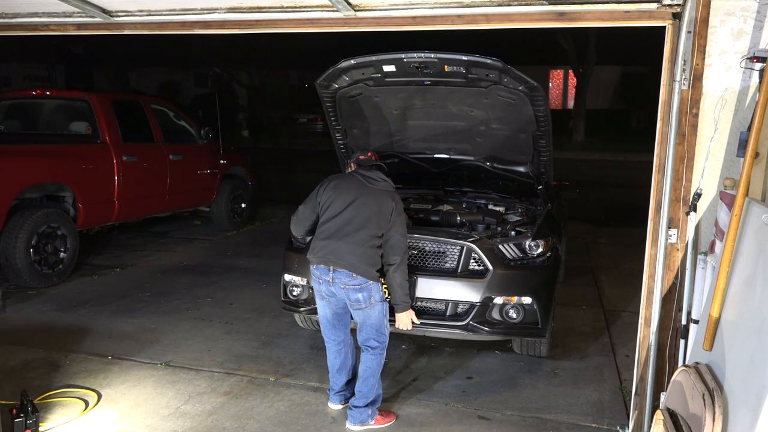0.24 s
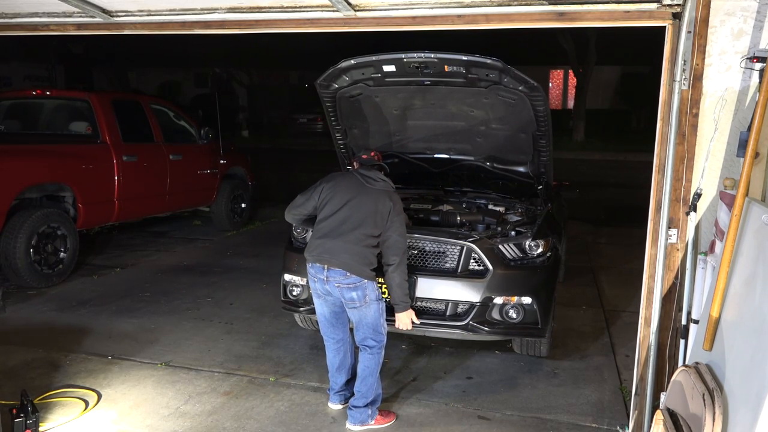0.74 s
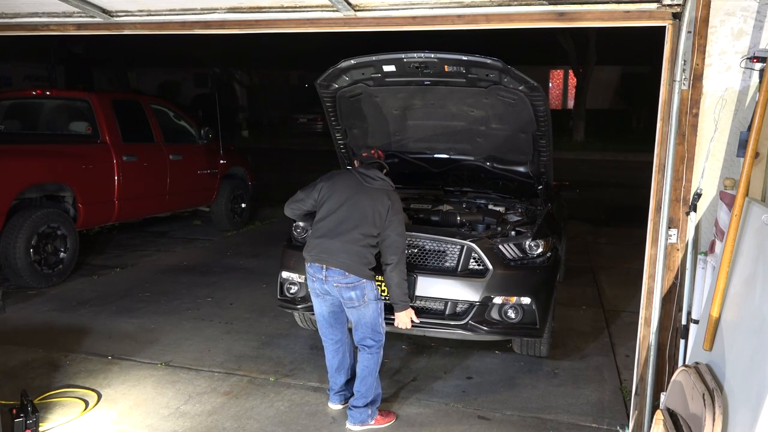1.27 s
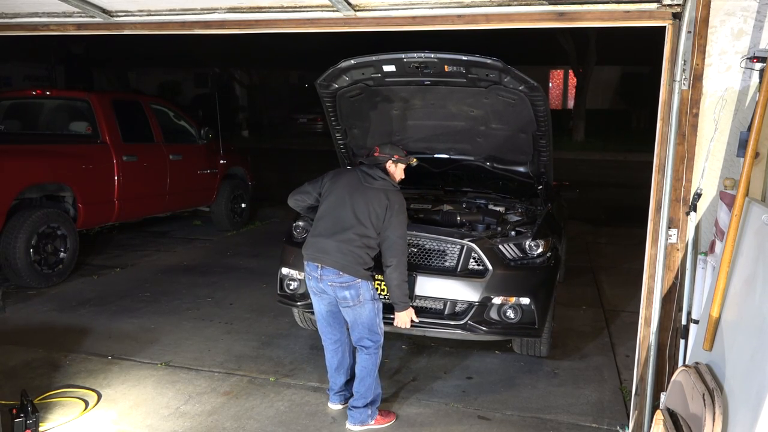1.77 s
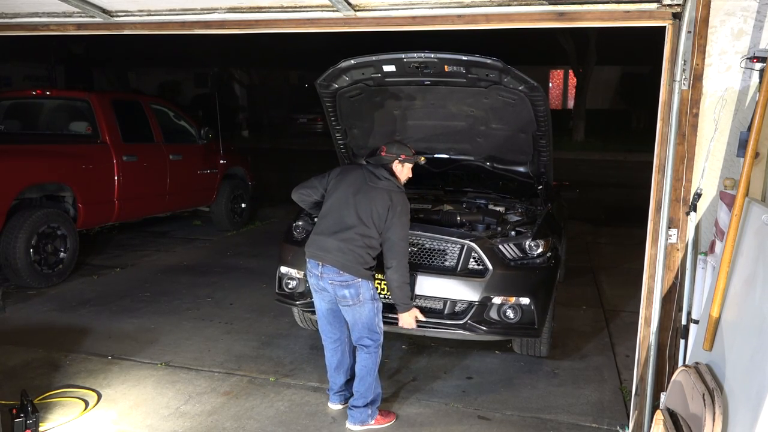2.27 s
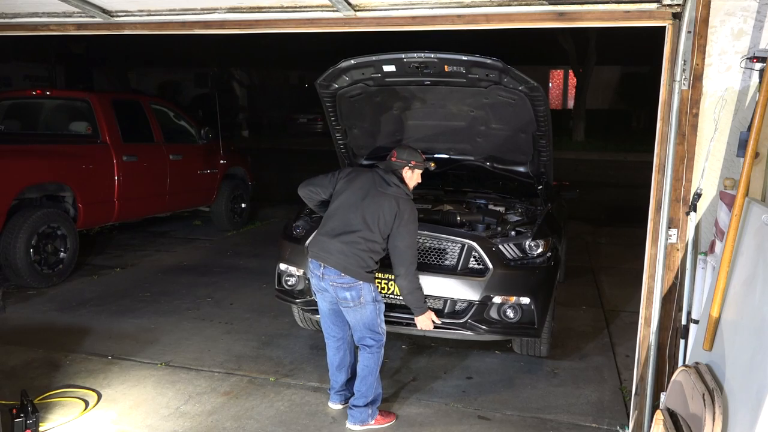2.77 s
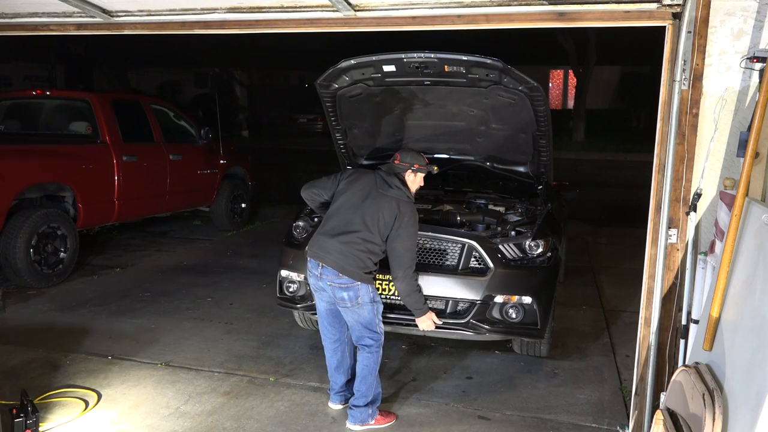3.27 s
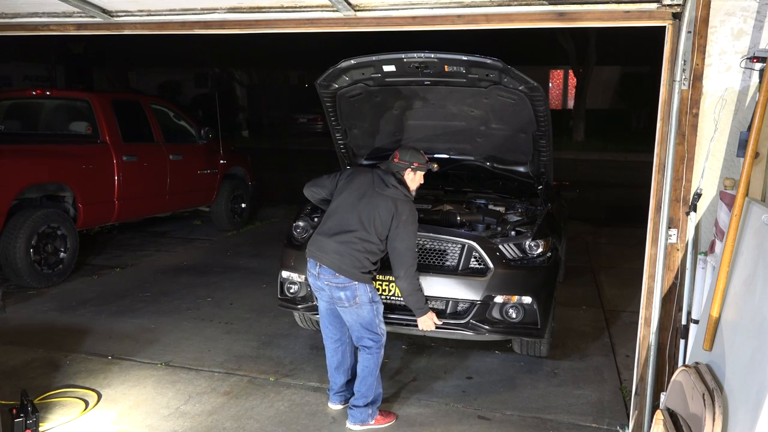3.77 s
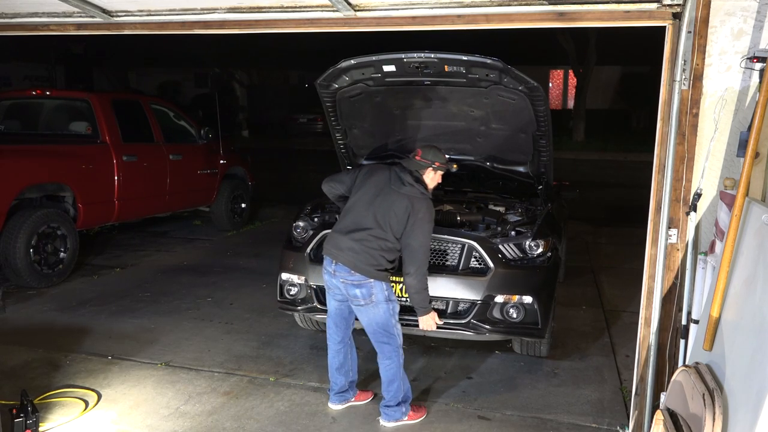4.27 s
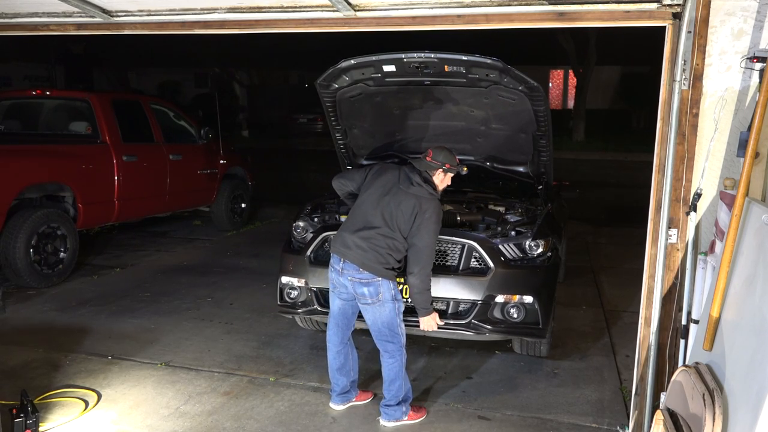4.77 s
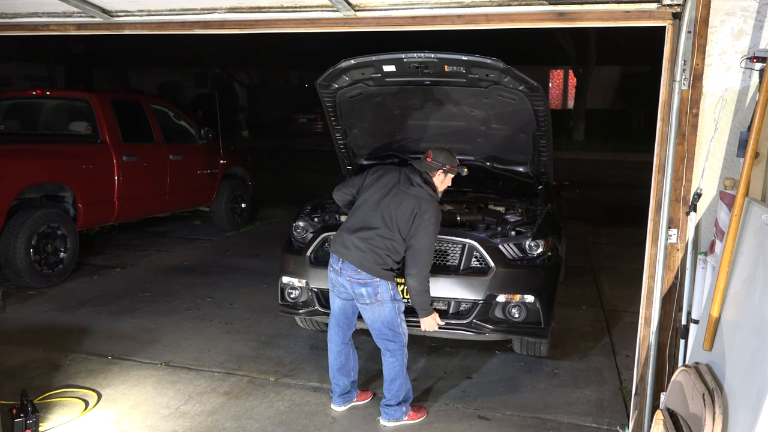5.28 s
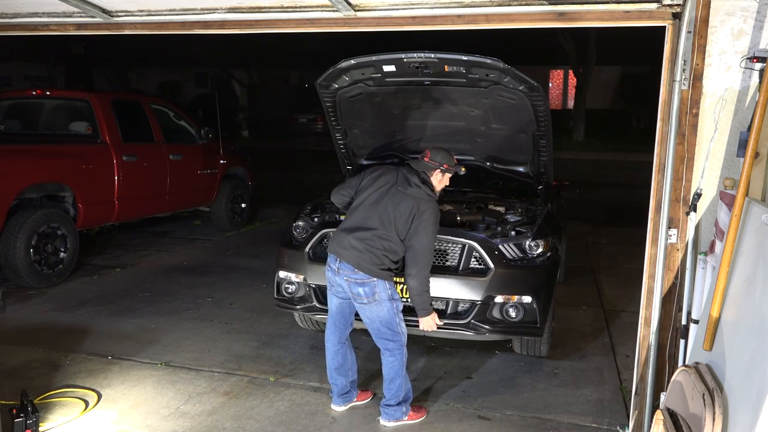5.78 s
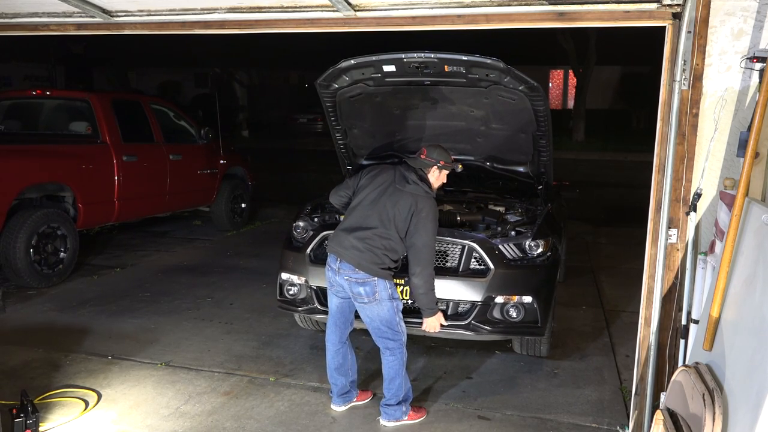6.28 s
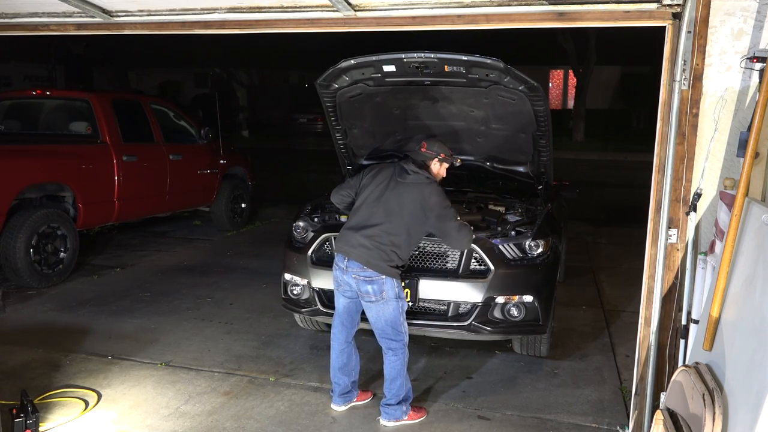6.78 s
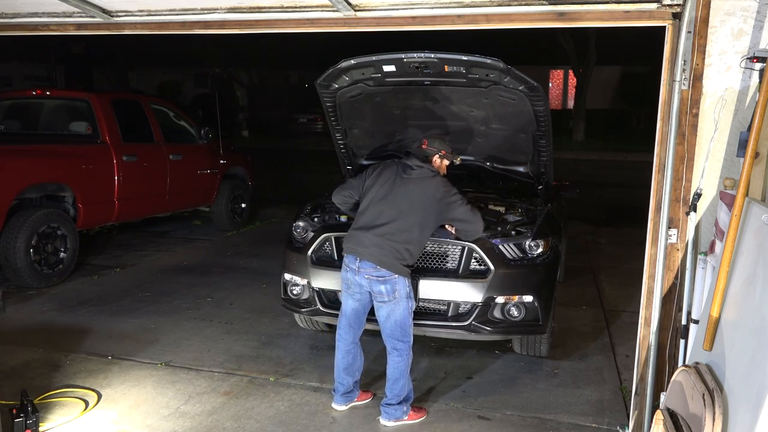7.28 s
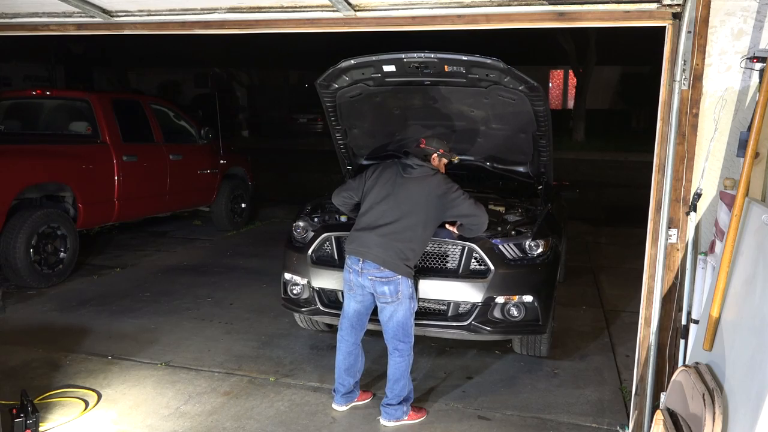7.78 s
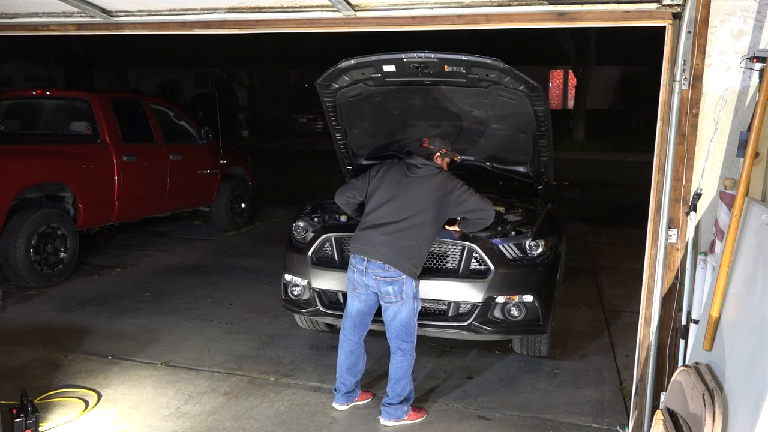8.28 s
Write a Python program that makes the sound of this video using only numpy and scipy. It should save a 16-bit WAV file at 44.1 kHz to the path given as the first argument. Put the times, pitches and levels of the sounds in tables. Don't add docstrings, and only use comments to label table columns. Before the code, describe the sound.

Hollow plastic bumper cover tugged off its clips, irregular knocks, snaps and clacks with short squeaks, in a garage with faint traffic hum.

```python
import sys
import numpy as np
from scipy import signal
from scipy.fft import rfft, irfft, next_fast_len
from scipy.io import wavfile
from scipy.ndimage import uniform_filter1d, map_coordinates

SR = 44100
rng = np.random.default_rng(int(sys.argv[2]) if len(sys.argv) > 2 else 0)


def inscribe(sig):
    pcm = np.round(np.clip(np.atleast_2d(sig).T, -1, 1) * 32767)
    wavfile.write(sys.argv[1], SR, pcm.astype(np.int16))


def gain_from_decibels(decibels):
    exponent = np.asarray(decibels, float) / 20
    return 10 ** exponent


N = 376613
SPAN = 2 ** 14

# frequency [Hz], level [dB per Hz].
RUMBLE_SPECTRUM = [(18, -59), (30, -0.5), (107, -1.5), (151, -9.5), (189, -7.5), (216, -11), (309, -39),
                   (350, -14.5), (460, -62), (770, -120)]
# frequency [Hz], level [dB per Hz].
STREET_SPECTRUM = [(120, -47), (200, -1.5), (220, -16), (255, -1), (302, -7), (343, -6), (613, -9.5),
                   (916, -9.5), (2500, -24), (3250, -64), (5500, -120)]
# frequency [Hz], level [dB per Hz].
TYRE_SPECTRUM = [(1200, -17), (2000, -39), (2600, 2.5), (3300, 2), (3900, -2), (5500, -9.5), (9000, -16.5)]
# time [s], level over rest [dB].
STRAIN = [(0, 0.5), (.76, 0.5), (1.12, 6.5), (1.38, 1), (2.28, 1.5), (2.76, 3), (2.97, 5), (3.16, 1.5),
          (3.88, 1.5), (4.33, 5.5), (4.5, 2.5), (4.73, 5), (5.02, 2), (5.25, -3), (5.4, 4), (6.14, 1.5),
          (7.63, 2), (8.16, 2.5)]
# frequency [Hz], level [dB per Hz].
AMPLIFIER_SPECTRUM = [(1500, -11.5), (4000, -4.5), (8000, -1.5), (13000, -2.5), (16000, -2.5)]
# frequency [Hz], time to fall by 60 dB [s].
GARAGE_DECAY = [(100, 0.38), (700, 0.26), (2000, 0.28), (5000, 0.3), (13000, 0.26)]

# start [s], rise [s], hold [s], hiss level [dB], body re hiss [dB].
SLIDES = [
    (2.245, .13, 0.19, -43.2, 2.5),
    (3.957, .05, .02, -49, 7),
    (4.119, 0.022, .004, -47, -6),
    (4.774, 0.072, 0.14, -49, 6.5),
    (6.282, .07, 0.11, -50.5, 5),
    (7.21, 0.061, 0.079, -59.5, 6.5),
]
# frequency [Hz], level [dB per Hz].
SLIDE_HISS = [(2350, -30), (4000, -0.5), (5130, -3.5), (6590, -6), (12800, -9.5), (14800, -14),
              (16000, -13)]
# frequency [Hz], level [dB per Hz].
SLIDE_BODY = [(600, -27), (1350, 6), (1850, -3), (2050, 8), (2350, -3), (3500, 0), (5200, -14.5),
              (7000, -60)]

# start [s], peak level [dB], pitch [Hz], length [s].
SQUEAKS = [(.01, -34, 415, 0.013), (4.9995, -21.5, 3230, 0.0055), (6.3, -37.5, 1500, 0.034),
           (6.791, -21, 1170, 0.006), (4.858, -29, 2900, 0.0086), (7.129, -49, 3030, 0.011),
           (7.265, -45, 2800, 0.005), (7.345, -47, 2900, .01), (7.283, -41, 2900, 0.005),
           (7.303, -40, 3200, .004), (7.317, -42, 3150, .005), (7.81, -33.5, 1270, 0.014),
           (8.048, -21, 3170, 0.0024), (4.299, -20, 980, 0.014), (8.058, -24, 1300, 0.006),
           (8.05, -42, 5300, .012), (8.052, -42, 8100, .011), (8.052, -43, 10100, .008),
           (7.236, -40, 700, .012), (7.242, -43, 1300, .006), (7.305, -51, 5400, .006),
           (7.236, -45, 2900, .003), (4.862, -20, 480, .006), (4.87, -30, 2600, .012)]
# start [s], peak level [dB], pitch [Hz], rattle length [s].
CHATTERS = [(4.139, -39, 6000, .004), (4.139, -43, 7700, .004), (4.116, -48, 3200, .006),
            (4.1845, -41, 3700, .004), (4.187, -39, 1300, .004), (4.211, -42, 2100, .005),
            (4.238, -36, 2900, .003), (4.24, -32, 1500, .005), (4.2905, -23, 2800, .003),
            (4.292, -19, 980, .005), (4.997, -47, 9100, .0015), (5.066, -50, 9100, .0015),
            (5.066, -50, 7700, .0015), (5.136, -29, 2900, .002), (4.645, -50, 4800, .006),
            (4.662, -52, 6400, .01), (5.376, -49, 5200, .002), (5.374, -36, 2000, .003),
            (8.0475, -28, 3200, .002), (8.048, -24, 1800, .004), (8.049, -33, 4900, .003),
            (8.053, -27, 1270, .006), (8.049, -43, 8200, .003), (6.791, -28, 1170, .004),
            (6.792, -41, 2800, .004), (5.69, -28, 1380, .006), (5.812, -27, 1050, .006),
            (5.792, -31, 1800, .004), (3.068, -33, 2000, .002), (4.728, -27, 430, .008),
            (4.296, -22, 280, .008)]

# frequency [Hz], width [Hz], level [dB].
CLIP_MODES = [(1500, 660, 0.5), (2290, 570, 0.5), (2920, 1120, -3.5)]
# frequency [Hz], level [dB].
TICK_SPECTRUM = [(2500, -24), (4500, 9.5), (7000, 0), (10000, -15), (16000, -22)]
# frequency [Hz], level [dB].
FIZZ_SPECTRUM = [(5000, -9), (9000, -1.5), (13000, -4), (16000, -12)]
# start [s], peak level [dB], tick re peak [dB], fizz re peak [dB].
CLIP_SNAPS = [(.897, -42, -26.5, -25), (.922, -35, -16, -32.5), (1.206, -35.5, -11, -34),
              (1.244, -42, -16, -20.5), (1.528, -45, -27, -16), (2.023, -44, -23, -25.5),
              (2.6823, -41, -24, -27), (2.77, -34, -25, -28), (2.787, -30, -23, -29), (2.87, -42, -24, -24),
              (2.945, -30, -16, -28), (2.978, -32, -22, -30), (3.067, -25.5, -57, -39),
              (3.322, -31, -35, -35), (4.004, -43, -23.5, -18), (4.1404, -44, 2, -12),
              (4.4514, -26, -20, -31), (5.1367, -17, -17.5, -24.5), (5.207, -35, -24, -25),
              (5.357, -59, -21, -23), (5.4046, -19, -37, -27), (5.768, -25.5, -38, -51),
              (6.115, -47.5, -14, -12), (7.243, -37.5, -22, -21), (7.953, -39, -25, -25),
              (8.4964, -28.5, -12.5, -27)]
# start [s], peak level [dB], tick re peak [dB], fizz re peak [dB].
CLIP_SLIPS = [(1.6003, -42, -41, -22), (1.674, -41.5, -25, -30), (3.4484, -34.5, -16.5, -24),
              (3.861, -40, -33, -28), (3.915, -41, -16, -16), (3.9765, -28.5, -40, -31),
              (4.235, -32, -26, -30), (4.725, -38.5, -15, -30), (5.6695, -30, -19, -30),
              (5.691, -22, -16.5, -28), (5.7917, -20, -25, -32.5), (6.7725, -37, -25, -22),
              (6.791, -24.5, -27, -31), (7.81, -41.5, -18, -27), (.958, -28.5, -17, -29)]
# start [s], peak level [dB], tick re peak [dB], fizz re peak [dB].
TAB_SNAPS = [
    (.789, -47.5, -8, -34),
    (1.119, -42, -25, -25),
    (1.3877, -42, -14, -30),
    (2.648, -41, -34, -31),
    (4.2895, -15.5, -13.5, -27),
    (4.856, -22, -55.5, -22.5),
    (5.0667, -25, -31, -28),
    (5.376, -31.5, -22, -24),
    (6.927, -38, -14, -32.5),
]
# start [s], peak level [dB], tick re peak [dB], fizz re peak [dB].
PIN_SNAPS = [
    (.9887, -15, -6.5, -34),
    (1.037, -49, -24, -43),
    (4.1849, -36, -16, -15),
    (4.6427, -28.5, -15.5, -56),
    (5.0, -21, -21, -23),
    (7.2935, -39, -14, -31),
    (8.0485, -23, -12, -10),
    (8.2154, -36.5, -37, -21),
    (8.4153, -33.5, -19, -28),
]

# peak time [s], peak level [dB], pitch [Hz], length [cycles].
BLOWS = [(0.9858, -3, 440, 0.77), (0.9885, -7, 700, 1.8), (2.983, -14, 404, 0.54), (4.294, -14, 950, 1.8),
         (5.4119, -10, 400, 0.64), (5.7048, -3, 440, 1.9), (5.3845, -15, 590, 1.1),
         (6.3695, -22, 610, 0.92), (6.803, -15, 650, 0.81), (5.203, -17, 530, 1.2), (5.139, -13, 1050, 1.2),
         (5.0725, -14, 900, 1.1), (5.155, -13, 1000, 1.1), (1.9945, -29, 730, 6), (5.4265, -17, 140, 2.5),
         (5.4275, -14, 420, 5), (5.445, -19, 135, 2.5), (5.43, -22, 60, 2.5), (6.81, -28, 62, 2.5),
         (1.01, -27, 60, 2.5), (4.2855, -24, 2400, 1.2), (2.9, -19, 420, 4), (2.905, -24, 170, 2.5),
         (2.91, -30, 680, 4), (2.789, -19, 150, 1.5), (2.773, -27, 1000, 5), (2.846, -25, 200, 1.5),
         (5.409, -17, 1180, 5), (4.119, -31, 280, 1.5), (5.812, -20, 230, 2), (5.7105, -14.5, 450, 3),
         (6.822, -22, 480, 3), (5.41, -15, 420, 4), (5.378, -20, 420, 5)]
# frequency [Hz], width [Hz], level [dB].
SHELL_MODES = [(280.6, 69, -2), (422, 103, -0.5), (577, 174, -4.5)]
# frequency [Hz], width [Hz], level [dB].
SMALL_PANEL_MODES = [(700, 149, 2), (980, 102, 3), (1210, 240, 0.5)]
# frequency [Hz], width [Hz], level [dB].
HOLLOW_MODES = [(65, 20, -8), (146, 55, -1), (208, 170, -13.5)]
# start [s], peak level [dB], thud re peak [dB], small panels re peak [dB].
WIDE_KNOCKS = [(1.118, -20, -14, -21), (3.068, -20.5, -11, -4), (3.099, -21.5, -5, -12),
               (3.322, -26.5, -16, -4), (3.861, -28, -12.5, -11.5), (3.973, -21, -2, -4.5),
               (4.016, -23, -10, -28), (4.106, -29.5, -1, -27), (4.196, -25.5, -5, -7.5),
               (4.325, -44, -16, 13), (5.062, -15.5, -21, -5), (5.239, -32.5, 1, -.5),
               (5.819, -17, -10.5, -8), (6.361, -22, -7.5, -10), (6.771, -20.5, -9, -7),
               (6.795, -19, -7, -6), (7.62, -32, -7, -6.5), (7.955, -24, -19, -22),
               (8.048, -24.5, -8.5, -2), (6.082, -20, -7, -16.5), (8.415, -21, -10, -12)]
# start [s], peak level [dB], thud re peak [dB], small panels re peak [dB].
MIDDLE_KNOCKS = [(.985, -8, -10.5, -6), (1.249, -32, -10, -3), (1.993, -27, -6, -9),
                 (2.761, -22.5, -13, 0.5), (2.875, -14, -11.5, -9), (2.894, -19, -10, -4),
                 (2.976, -13, -10.5, -12), (3.149, -31, -2, -3.5), (4.45, -13, -8, -15),
                 (4.507, -22, -12, -25), (4.721, -22, -8, -10), (5.135, -16, -10, -3.5),
                 (5.2, -16, -5, -10), (5.35, -26, -8, -5), (5.371, -13, -12, -8.5),
                 (5.405, -10.5, -7.5, -6.5), (5.433, -15.5, -16, -15), (5.675, -13, -4.5, -10.5),
                 (5.695, -9.5, -18, -11.5), (5.769, -16, -4.5, -9), (6.927, -36, -15, 0.5),
                 (7.812, -38, -5, -19)]
# start [s], peak level [dB], thud re peak [dB], small panels re peak [dB].
CORNER_KNOCKS = [(1.029, -26, -5, 3), (1.388, -40.5, -2, 2), (1.523, -29, -22, -7), (3.447, -19.5, 2.5, -8),
                 (3.489, -40.5, -8, 8), (4.233, -22.5, -17, -5), (4.287, -9, -10.5, -4.5),
                 (4.643, -29.5, -22, -6.5), (4.858, -16.5, -28, -7), (4.998, -20, -9, -3.5),
                 (5.279, -29.5, -2.5, -10), (5.786, -17.5, -17, -4.5), (6.819, -26, -2, -9),
                 (7.237, -40.5, -15, 5), (8.495, -35, -30, 8.5)]
# start [s], peak level [dB], thud re peak [dB], small panels re peak [dB].
RUBS = [
    (.962, -19, -2.5, -13),
    (1.19, -21.5, -6, -15),
    (1.645, -26.5, -10, -9),
    (2.742, -18, -6.5, -23),
    (2.789, -24.5, -5, -18),
    (5.021, -23, -2, -22),
]


def along(points, hz):
    f, v = np.transpose(points)
    return np.interp(np.log(hz + 1), np.log(f + 1), v)


def unit(x):
    return x / np.sqrt(np.mean(x ** 2) + 1e-20)


def wobble(rate):
    knots = rng.standard_normal(int(N * rate / SR) + 4)
    return map_coordinates(knots, [np.arange(N) * rate / SR])


def noise(spectrum, patchy_db):
    z = signal.stft(rng.standard_normal(N), nperseg=512)[2]
    field = uniform_filter1d(rng.standard_normal(z.shape), 5, 0)
    field = uniform_filter1d(field, 10, 1)
    patchy = signal.istft(z * gain_from_decibels(patchy_db * unit(field)), nperseg=512)[1][:N]
    size = next_fast_len(N + 8192)
    colour = gain_from_decibels(along(spectrum, np.fft.rfftfreq(size, 1 / SR)))
    return unit(irfft(rfft(patchy, size) * colour, size)[:N])


def modes(hz, rows):
    return sum((-1) ** k * gain_from_decibels(db) * 1j * hz * width / (centre ** 2 - hz ** 2 + 1j * hz * width)
               for k, (centre, width, db) in enumerate(rows))


def own_modes(hz, centres, width, db):
    return np.array([modes(hz, [(centre, width * centre, db)]) for centre in centres])


def contacts(lengths, lead, spiky, wet_db):
    t = np.arange(SPAN) / SR
    draws = rng.standard_normal((len(lengths), 2, SPAN))
    length = np.clip(lengths, .001, .06)[:, None]
    grains = np.sign(draws[:, 0]) * abs(draws[:, 0]) ** spiky
    rattle = grains * (t / length) ** 0.6 * np.exp(-t / length)
    rattle = rattle / np.linalg.norm(rattle, axis=1, keepdims=True)
    strike = lead * 0.0044 / (0.0022 + length) * (t == 0)
    hz, s, z = signal.stft(draws[:, 1], SR, nperseg=256)
    decay = gain_from_decibels(-60 * s / along(GARAGE_DECAY, hz)[:, None])
    walls = signal.istft(z * decay, SR, nperseg=256)[1][:, :SPAN]
    walls = walls * (1 - np.exp(-(t / (0.002 + 1.06 * length)) ** 2))
    walls = walls / np.linalg.norm(walls, axis=1, keepdims=True)
    return rfft(rattle + strike + gain_from_decibels(wet_db) * walls)


def placed(times, levels_db, spectra, smooth):
    sounds = irfft(spectra)[:, :SPAN - 1024]
    power = uniform_filter1d(sounds[:, :SPAN // 8] ** 2, round(smooth * SR))
    peaks = np.sqrt(abs(power).max(1))
    out = np.zeros(N + 2 * SPAN)
    for s, gain, sound in zip(times, gain_from_decibels(levels_db) / peaks, sounds):
        out[round(s * SR):][:len(sound)] += gain * sound
    return out[:N]


def events(kinds):
    return np.transpose(sorted((*row, hz, length) for rows, hz, length in kinds for row in rows))


def night():
    s, db = np.transpose(STRAIN)
    strain_db = np.interp(np.arange(N) / SR, s, db)
    rumble_db = -39.5 + 0.12 * strain_db + 0.32 * wobble(18)
    street_db = -48.5 + strain_db + 1.0 * wobble(3.46)
    tyres_db = -65 + 1.1 * strain_db + 0.82 * wobble(2.83)
    rumble = gain_from_decibels(rumble_db) * noise(RUMBLE_SPECTRUM, patchy_db=0.5)
    street = gain_from_decibels(street_db) * noise(STREET_SPECTRUM, patchy_db=1.5)
    tyres = gain_from_decibels(tyres_db) * noise(TYRE_SPECTRUM, patchy_db=1.0)
    return rumble + street + tyres


def slides():
    hiss, body = np.zeros(N), np.zeros(N)
    release = 0.073
    for s, rise, hold, db, body_db in SLIDES:
        moments = np.cumsum([0, rise, hold, release])
        t = np.arange(round(moments[-1] * SR)) / SR
        press = gain_from_decibels(db + np.interp(t, moments, [-20.5, 0, -6, -29]))
        hiss[round(s * SR):][:len(t)] += press
        body[round(s * SR):][:len(t)] += press * gain_from_decibels(body_db)
    grip = gain_from_decibels(.6 * wobble(40) + 1.4 * wobble(300))
    return grip * (hiss * noise(SLIDE_HISS, patchy_db=.7) + body * noise(SLIDE_BODY, patchy_db=1.2))


def squeaks():
    out, t = np.zeros(N + SPAN), np.arange(SPAN) / SR
    for s, db, hz, length in SQUEAKS:
        drift = 0.065 * np.cumsum(rng.standard_normal(SPAN))
        catch_db = 1.8 * unit(uniform_filter1d(rng.standard_normal(SPAN), 150))
        swell = gain_from_decibels(db + 1.5 + catch_db) * t / length * np.exp(-t / length)
        out[round(s * SR):][:SPAN] += swell * np.sin(2 * np.pi * hz * t + drift)
    return out[:N]


def chatters():
    s, db, own_hz, length = np.transpose(CHATTERS)
    hz = np.fft.rfftfreq(SPAN, 1 / SR)
    own = own_modes(hz, own_hz, width=.3, db=0) ** 2
    return placed(s, db - 3, contacts(length, lead=.4, spiky=2.2, wet_db=-5) * own, smooth=.004)


def clips():
    s, db, tick_db, fizz_db, lead_hz, length = events([
        (CLIP_SNAPS, 1420, 0.0037), (CLIP_SLIPS, 1400, 0.0094),
        (TAB_SNAPS, 2470, 0.0072), (PIN_SNAPS, 3440, 0.0031)])
    hz = np.fft.rfftfreq(SPAN, 1 / SR)
    burst = contacts(length, lead=0.62, spiky=1.7, wet_db=0.5)
    own = own_modes(hz, lead_hz, width=0.19, db=1.5)
    stiff = 1j * hz / (900 + 1j * hz) / (1 - (hz / 4200) ** 2 + 1.2j * hz / 4200) ** 2
    rings = placed(s, db - 7.5, burst * stiff * (1 + own) * modes(hz, CLIP_MODES), smooth=0.0052)
    edge = contacts(1.04 * length, lead=0.53, spiky=2.4, wet_db=-4.0)
    tick = placed(s, db + tick_db - 5, edge * gain_from_decibels(along(TICK_SPECTRUM, hz)), smooth=0.0071)
    fizz = placed(s, db + fizz_db - 2, edge * gain_from_decibels(along(FIZZ_SPECTRUM, hz)), smooth=0.0046)
    return rings + tick + fizz


def blows():
    t, out = np.arange(N) / SR, np.zeros(N)
    for s, db, hz, cycles in BLOWS:
        near = slice(round((s - .06) * SR), round((s + .06) * SR))
        turns = hz * (t[near] - s)
        out[near] += gain_from_decibels(db) * np.exp(-(2 * turns / cycles) ** 2) * np.cos(2 * np.pi * turns)
    return out


def shell():
    s, db, thud_db, small_db, lead_hz, length = events([
        (WIDE_KNOCKS, 259, 0.0097), (MIDDLE_KNOCKS, 422, 0.0095),
        (CORNER_KNOCKS, 517, .0101), (RUBS, 383, 0.023)])
    hz = np.fft.rfftfreq(SPAN, 1 / SR)
    soft = 1 / (1 + 1j * hz / 1300) ** 2
    burst = soft * contacts(length, lead=0.95, spiky=2.94, wet_db=-1.0)
    own = own_modes(hz, lead_hz, width=0.2, db=4)
    large = modes(hz, SHELL_MODES) / (1 + 1j * hz / 800)
    hollow = modes(hz, HOLLOW_MODES) / (1 + 1j * hz / 250)
    panels = placed(s, db - 8.0, burst * (1 + own) * large, smooth=0.0027)
    small = placed(s, db + small_db - 4.0, burst * modes(hz, SMALL_PANEL_MODES), smooth=0.002)
    thud = placed(s, db + thud_db - 5.5, burst * hollow, smooth=0.034)
    return panels + small + thud


def scene():
    heard = night() + slides() + squeaks() + chatters() + clips() + blows() + shell()
    return np.tile(heard, (2, 1))


def top_cut(x):
    return signal.sosfilt(signal.butter(12, 16630, fs=SR, output="sos"), x)


def record(dry):
    shared_hiss = gain_from_decibels(-63) * noise(AMPLIFIER_SPECTRUM, patchy_db=0.8)
    side_hiss = gain_from_decibels(-64.5) * noise(AMPLIFIER_SPECTRUM, patchy_db=-4.0)
    hiss = shared_hiss + side_hiss * np.array([[1], [-1]])
    size = next_fast_len(N)
    hz = np.fft.rfftfreq(size, 1 / SR)
    port = 1 + modes(hz, [(3270, 290, -9)])
    band = (hz < 15830) / (1 + (40 / (hz + 1)) ** 4)
    picked_up = irfft(rfft(dry, size) * port, size)[:, :N]
    heard = irfft(rfft(picked_up + hiss, size) * band, size)[:, :N]
    return top_cut(heard)


dry = scene()
out = record(dry)
inscribe(out)
```